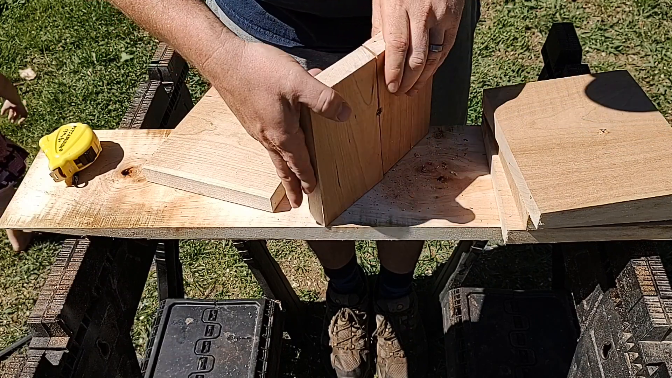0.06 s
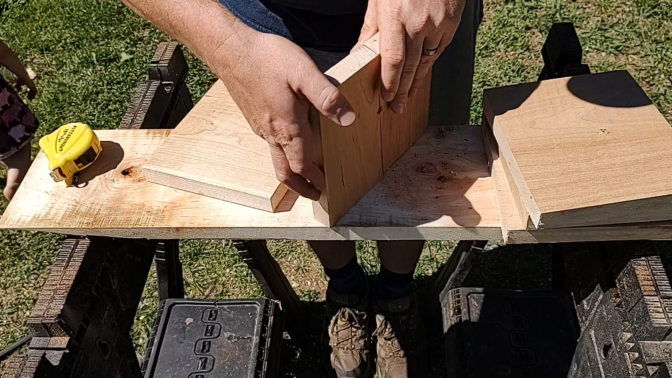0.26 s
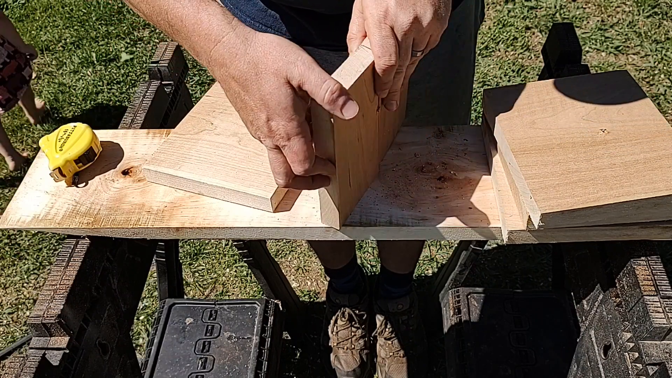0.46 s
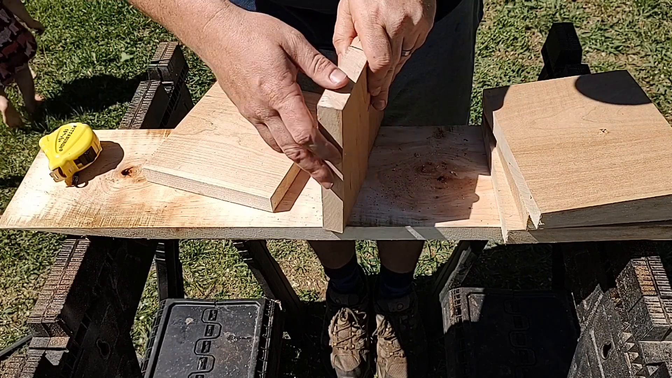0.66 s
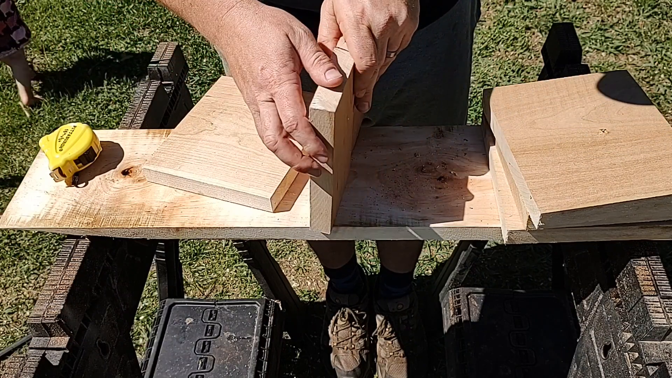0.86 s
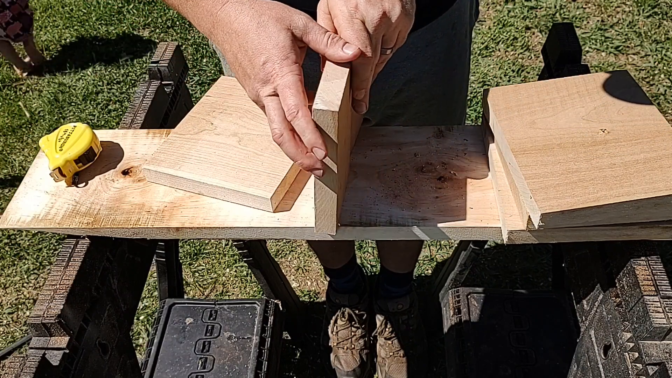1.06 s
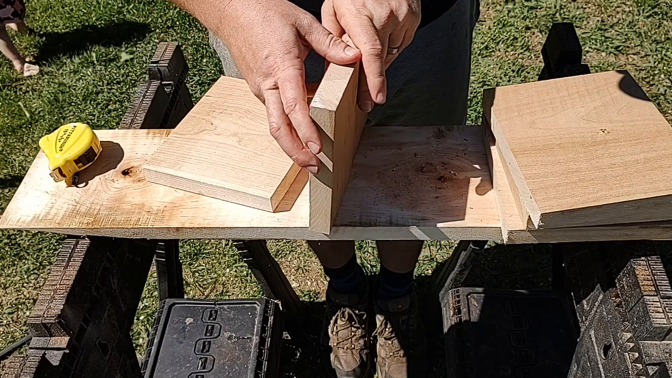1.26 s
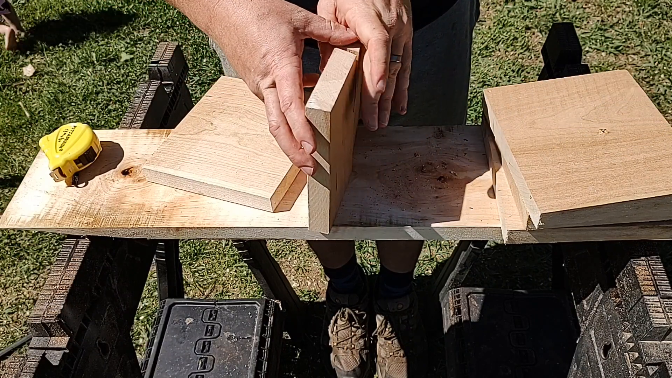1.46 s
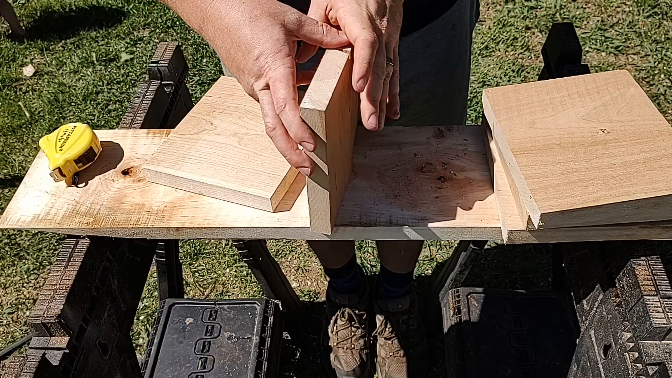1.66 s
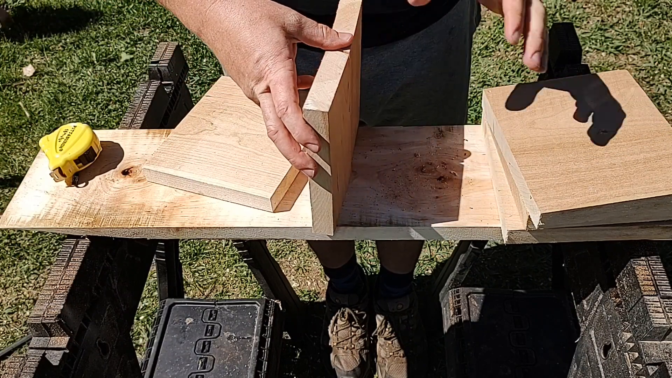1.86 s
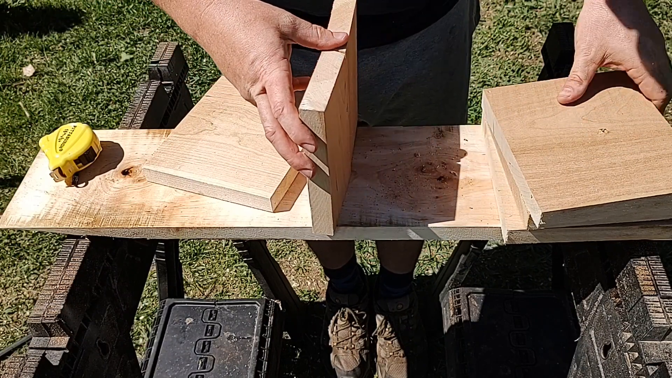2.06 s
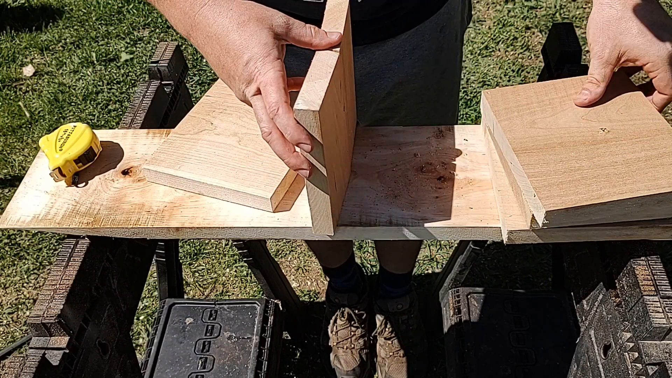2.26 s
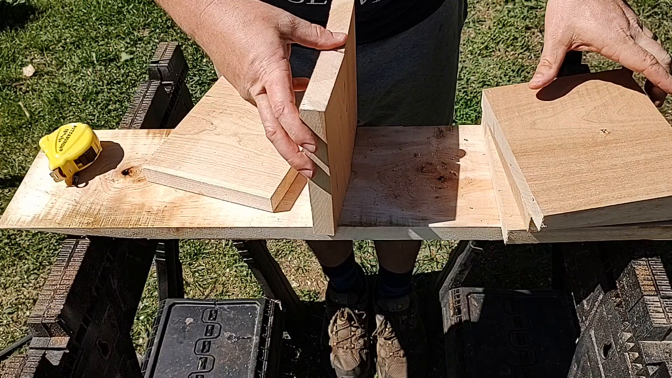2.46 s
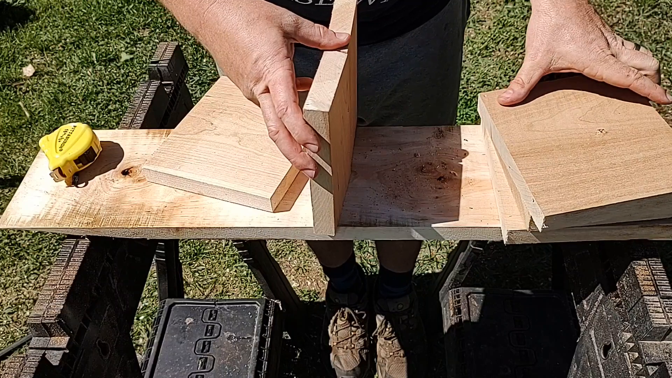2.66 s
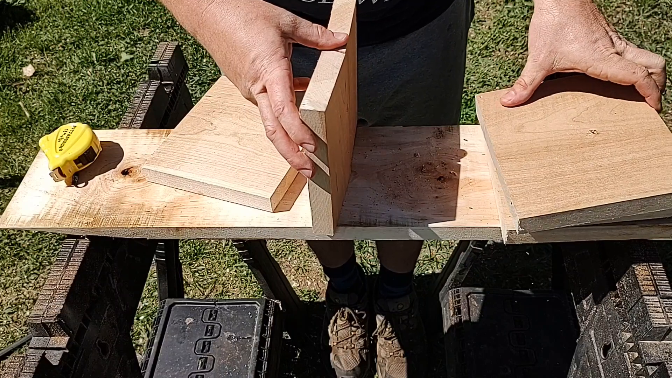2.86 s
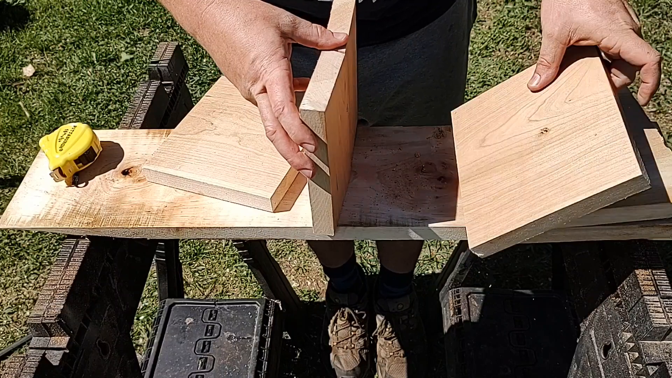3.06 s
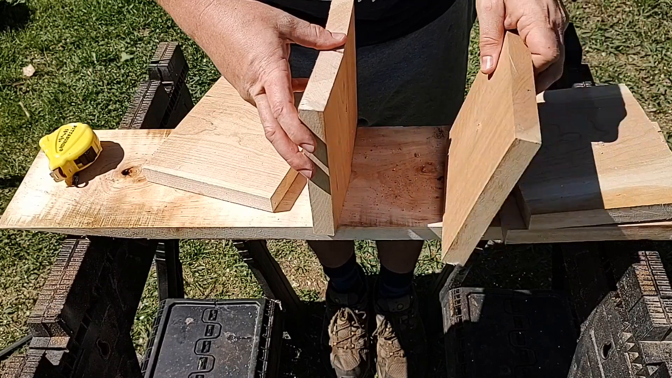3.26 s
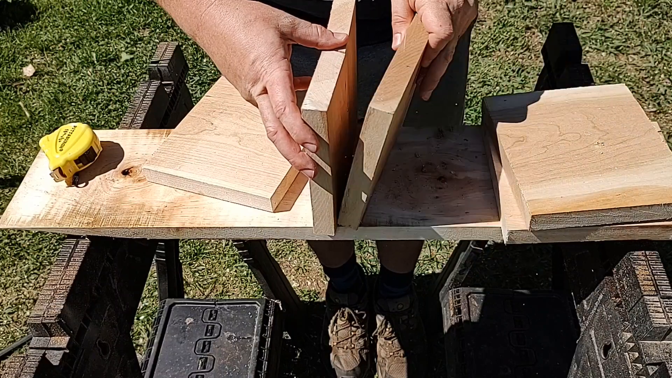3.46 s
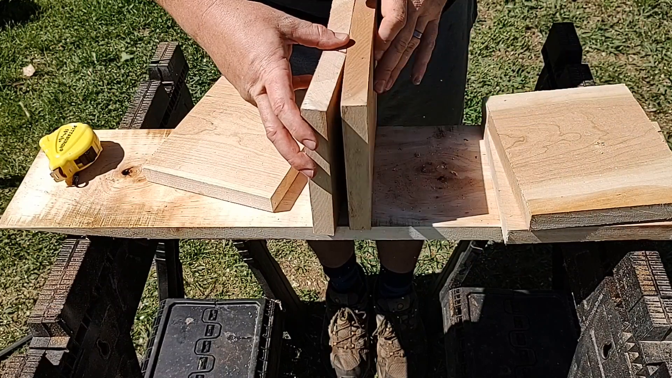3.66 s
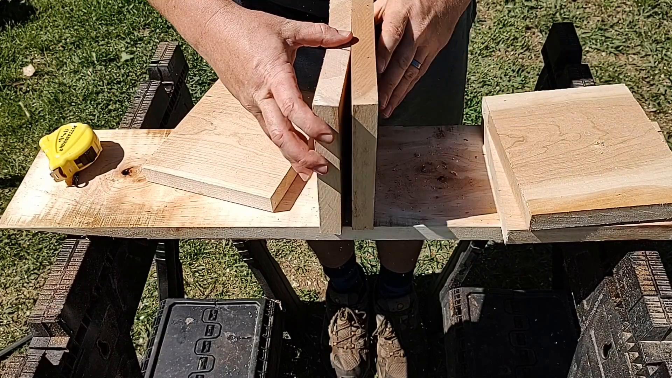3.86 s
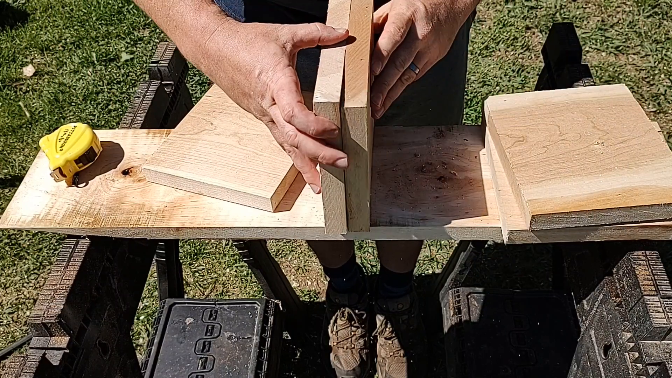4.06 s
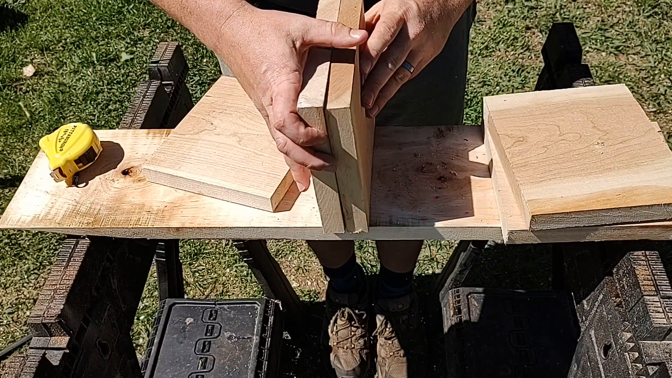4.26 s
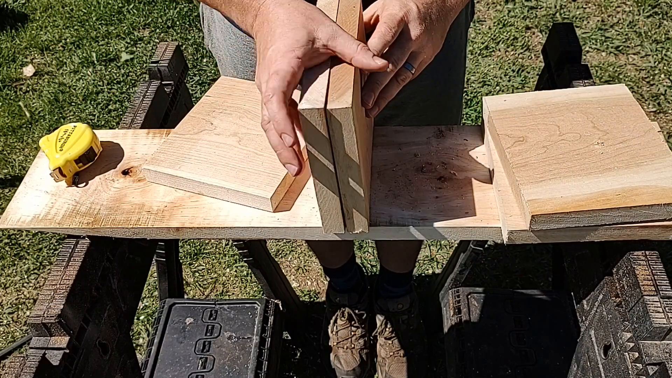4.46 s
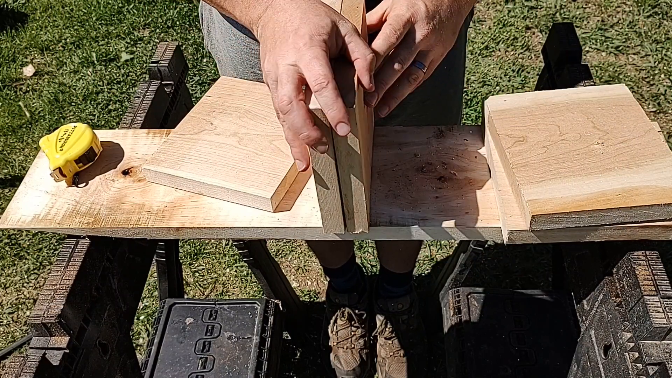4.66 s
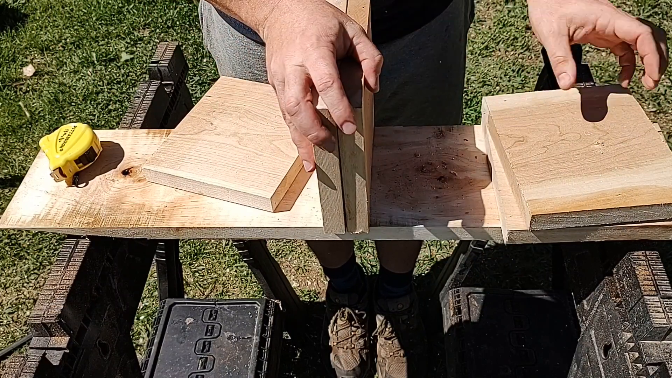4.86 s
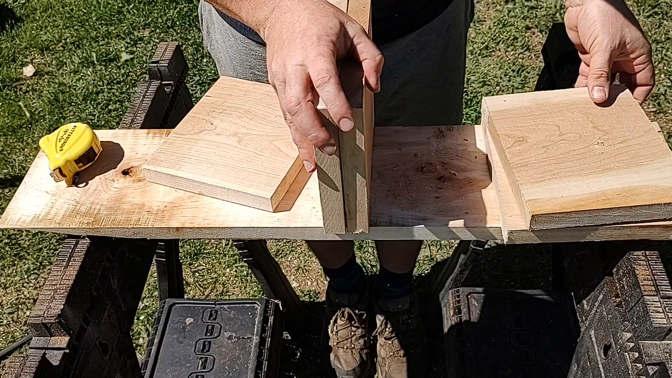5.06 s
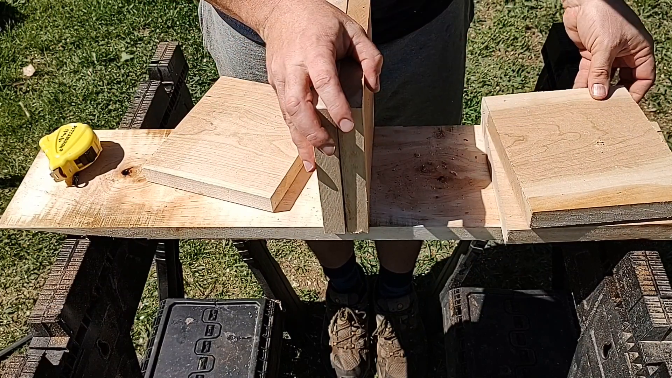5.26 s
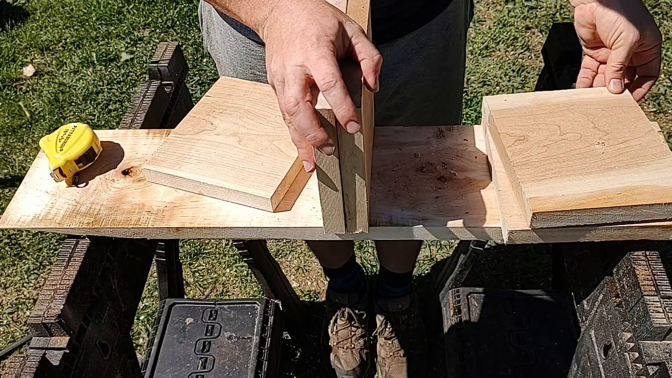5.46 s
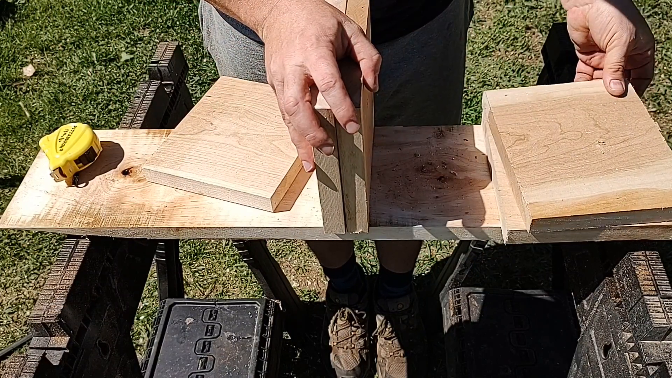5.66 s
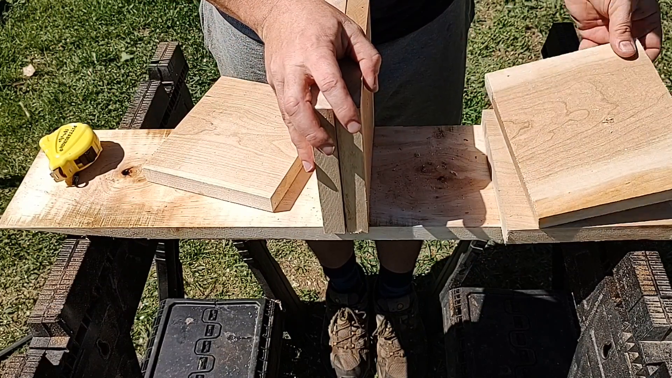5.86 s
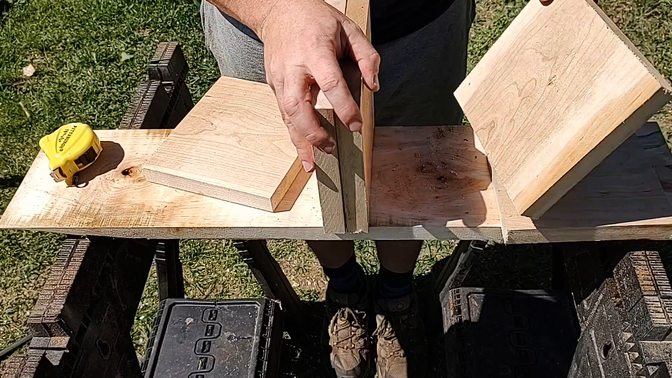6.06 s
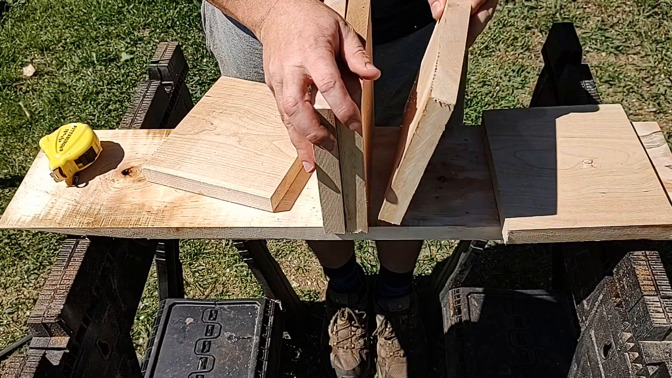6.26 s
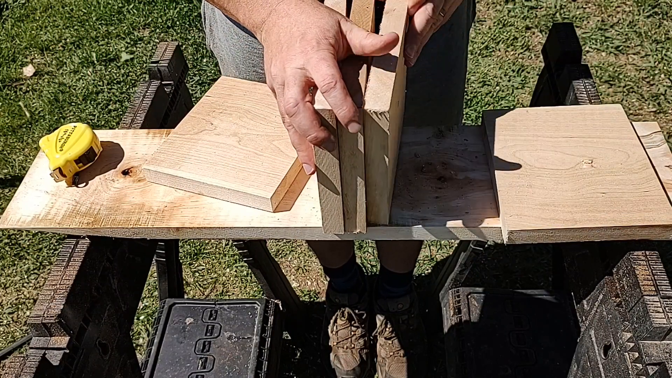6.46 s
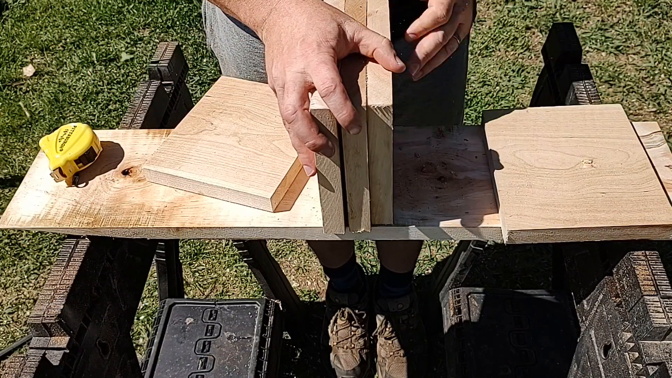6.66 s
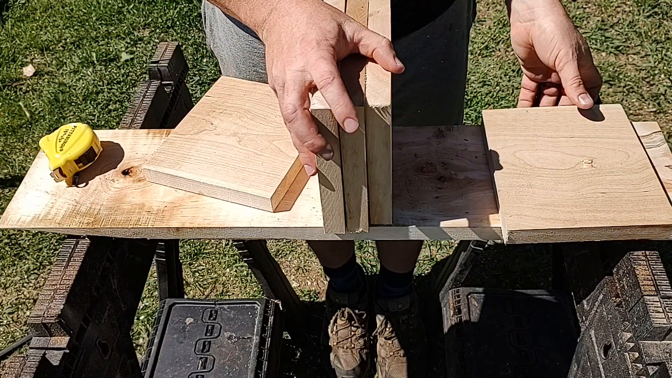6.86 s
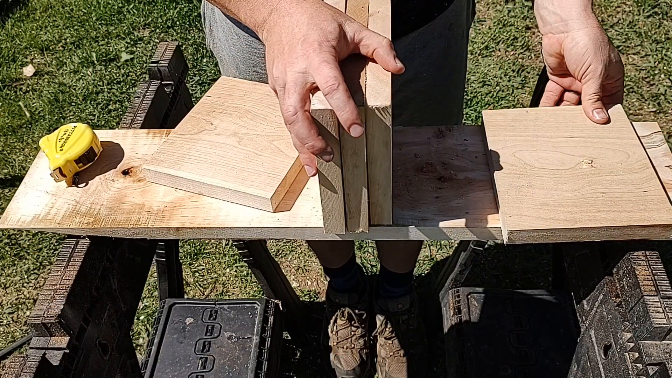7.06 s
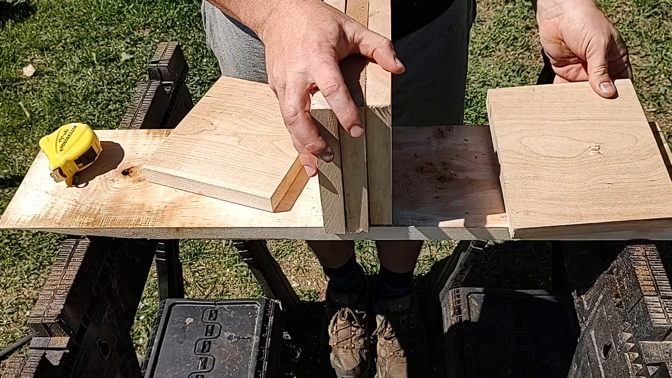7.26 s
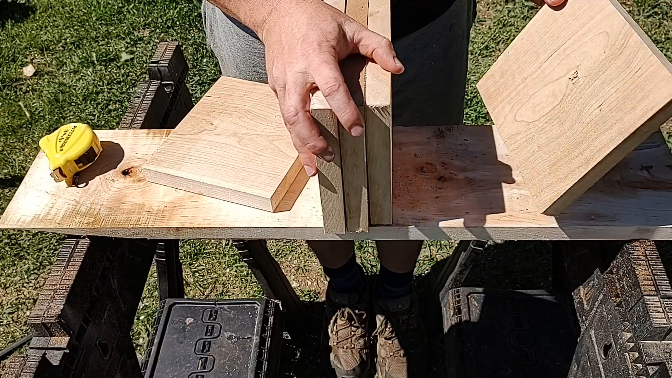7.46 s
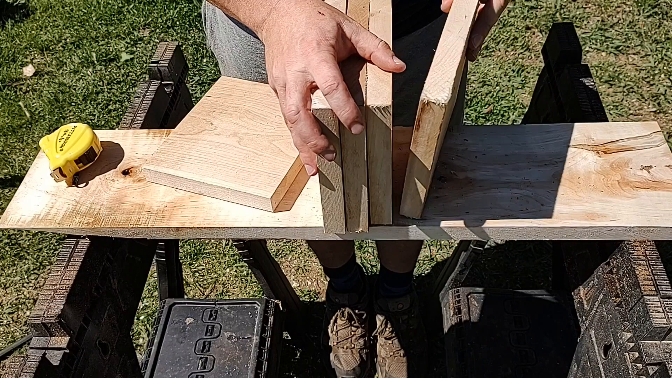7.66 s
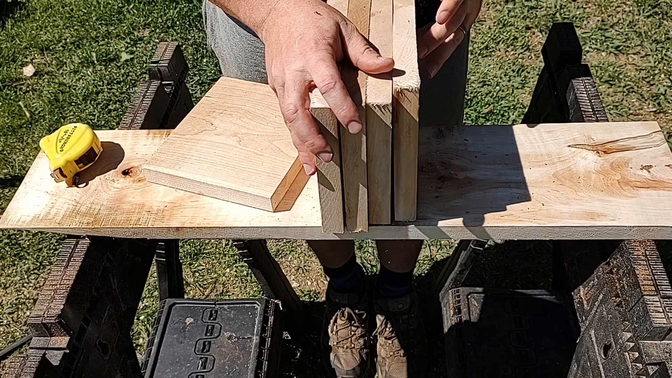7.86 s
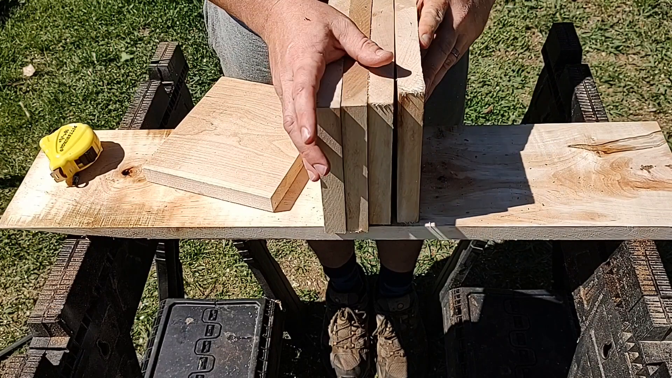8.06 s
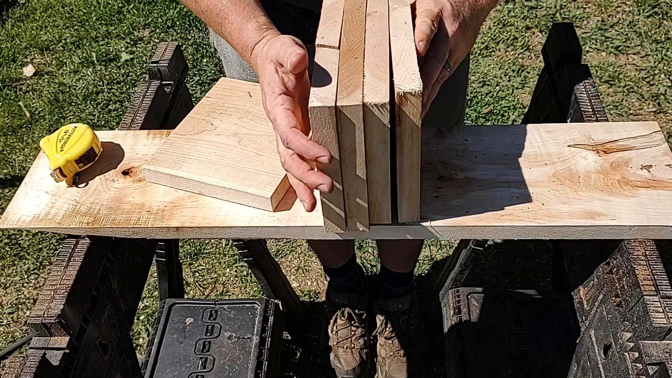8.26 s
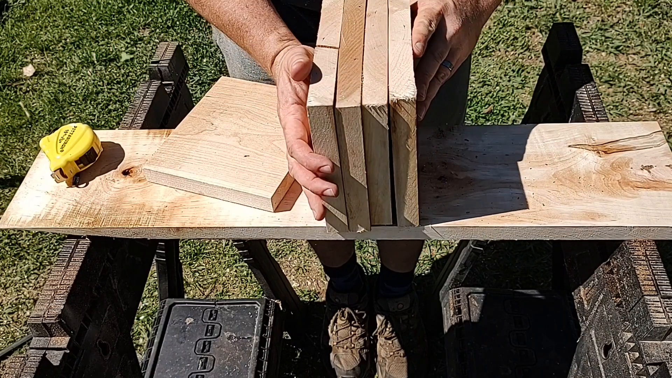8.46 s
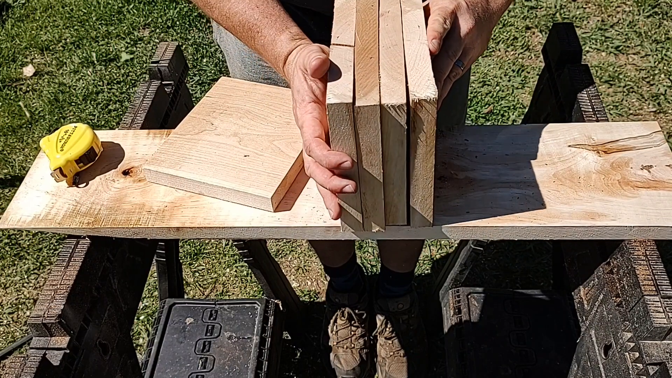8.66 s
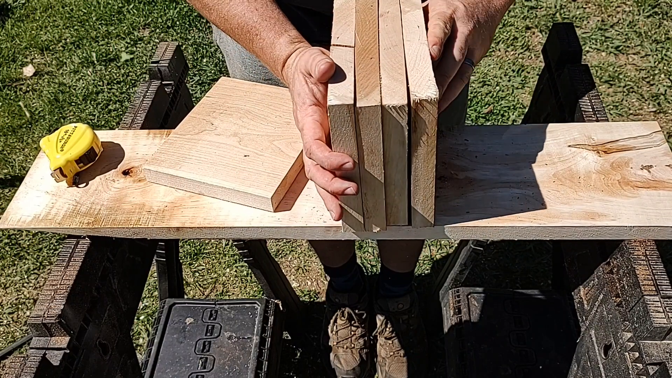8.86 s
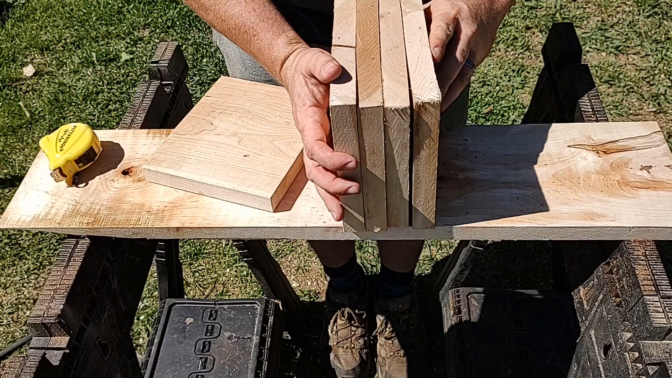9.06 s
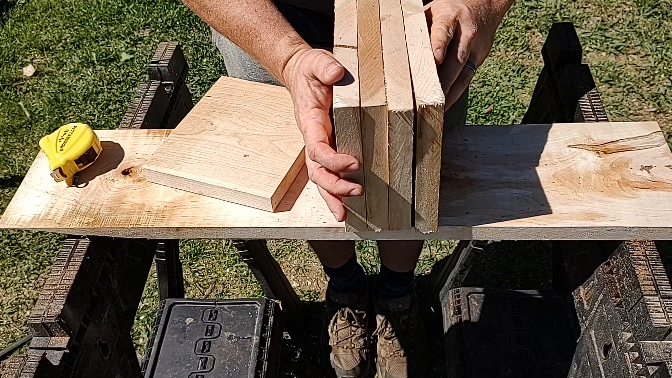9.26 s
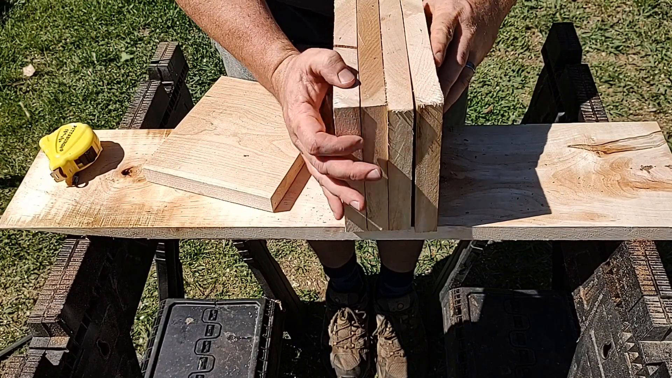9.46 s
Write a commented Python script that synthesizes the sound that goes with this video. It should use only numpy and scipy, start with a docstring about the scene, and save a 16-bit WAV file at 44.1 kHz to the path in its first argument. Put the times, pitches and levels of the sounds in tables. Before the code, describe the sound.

Close stereo sound of short pine boards handled on a plank outdoors. Soft sliding and dry hand brushing come first, then a cluster of woody knocks and claps as a second board joins the first. A third clacks in, and the last drops and slams loudly against the stack. Quiet shuffling follows. A light breeze and low distant engine hum swell gently behind.

```python
"""Short pine boards slide off a pile, knock on a plank and clap together into a stack, outdoors.
Each knock rings the wood's own notes, with a dense burst and a crunch of fibres.
Sliding and dry hands drive noise through the boards' notes, with a hiss from the surface.
Behind the work, gusts of a light breeze rumble and rush, and a low hum, like a distant engine,
swells with them."""
import sys
import numpy as np
from scipy import signal
from scipy.fft import rfft, irfft, next_fast_len
from scipy.io import wavfile
from scipy.ndimage import map_coordinates

SR = 44100
rng = np.random.default_rng(int(sys.argv[2]) if len(sys.argv) > 2 else 0)


def file_out(sig):
    """Save sig as 16-bit WAV at sys.argv[1]."""
    # one column per channel
    cols = np.atleast_2d(sig).T
    # limit, then scale
    lim = np.clip(cols, -1, 1)
    pcm = np.round(lim * 32767).astype(np.int16)
    wavfile.write(sys.argv[1], SR, pcm)


N = 418950  # length in samples

# In lists of ringing notes and noise colours, the dB only compare one row with another.
# A ring time is how long a note takes to fall by 60 dB, before a blow's own length factor.

# A board's edge lands or bounces on the plank. Each row: time in seconds, level in dB,
# extra thud in dB, extra brightness in dB.
KNOCKS = [ (1.5, -54, 6, 0), (2.74, -54, 7, -20), (3.279, -33, 6.5, -20), (3.34, -48, -1.5, -3),
          (3.415, -45, 8.5, -3), (3.545, -31.5, 9, -11), (3.672, -37.5, 13, -17), (4.706, -58.5, -2, -11),
          (5.089, -52.5, -2, -18), (5.743, -45.5, -1.5, -34), (5.765, -49.5, -1, -4),
          (6.493, -34.5, 3, -18), (6.499, -37.5, -7, -12.5), (8.395, -51, -10, -11),
          (8.526, -43.5, 5.5, -29)]
# A tap at this level rings for the listed time; a blow harder by RING_HALVES_DB rings half as long,
# because it is pressed home.
TAP_DB, RING_HALVES_DB = -49, 45.5
# The second board claps against the first, or one shifts in the stack. Each row: time in seconds,
# level in dB, extra thud in dB, extra brightness in dB, ring length factor (short: tight grip).
CLAPS = [(3.622, -28, -10.5, -9, 0.69), (3.718, -41, -6, -39, 0.71), (3.773, -38, -14.5, -18, 2.5),
         (3.789, -25, -21, -4, 1.1), (3.845, -35, 0, 0.5, 0.6), (3.851, -38, 3, 0, 0.49),
         (6.56, -41, -3, -17, 1), (8.108, -42.5, -5.5, -8, 0.9)]
# More blows, with the same columns as the claps.
# A lifted board, held loosely, taps its neighbour.
LOOSE_TAPS = [(5.046, -46, 1, 2, 1.3), (6.458, -38, -3, -9, 1.4)]
# The third board's top edge claps against the other two.
EDGE_CLAPS = [(6.656, -29, -1.1, 0.5, 0.91)]
# The last board is dropped on its edge, which settles flat and jumps once.
DROPS = [(7.8252, -16.5, -1, -14.5, 0.63), (7.8312, -26.5, -3.5, 5.5, 0.53), (7.841, -33, 5, -2, 1)]
# Its corner clips the stack, then its face slams home and rebounds.
CORNER_HITS = [(7.968, -23.5, -1, 0.5, 0.91)]
SLAMS = [(7.9838, -13.5, 0.5, -1.3, 0.76), (7.9912, -26, -8, -2, 1)]
# Air pushed out as the last face slams home. The row: time in seconds, peak in dB, pitch in Hz.
AIR_CLAP = (7.9841, -2, 960)

# The notes of struck wood. Each row: pitch in Hz, level in dB, ring time in seconds.
# The plank with a board on it:
PLANK = [(164, -25, 0.19), (213.5, -11.5, 0.17), (320, -3, 0.093), (362, -10.5, 0.1), (518, -9, 0.092),
         (652, -6.5, 0.1), (685, 10, 0.024), (776, -6, 0.12), (902, -8, 0.13), (1110, 0, 0.069),
         (1110, -1, 0.017), (1230, -15, 0.03), (1440, -8, 0.02), (1658, -31, 0.021), (1800, -9, 0.11),
         (2420, -18, 0.021)]
# A board held in the hand:
HELD_BOARD = [(330, -9, 0.065), (675, 5, 0.1), (934, 0, 0.023), (1210, -3, 0.029), (1175, -16, 0.023),
              (1660, -9.5, 0.083), (1710, 1.5, 0.04), (2730, -22.5, 0.085), (4220, -28, 0.058)]
# A loosely held board:
LOOSE_BOARD = [(654, -6.5, 0.068), (1335, -15, 0.061), (1800, -2, 0.038), (2700, -20, .05),
               (3500, -15, .028), (3940, -17, .05), (5180, -7, 0.03), (6730, -6, 0.027), (7241, -13, 0.029)]
# Three boards together:
THREE_BOARDS = [(290, -7, 0.043), (684, 1, .085), (790, -13, 0.17), (1120, 2, 0.032), (1450, -11, 0.049),
                (1603, -3, 0.057), (1790, 2.5, 0.022), (2200, -4, 0.024), (2750, -6.5, .028),
                (3330, -11, .025), (4200, -23, .03)]
# The plank under the dropped last board:
LOADED_PLANK = [(160, -4.5, 0.12), (280, -7, .085), (498.4, -10, 0.073), (693.6, 3, 0.048), (865, -5, .07),
                (1041, -6, .06), (1142, -8, .065), (1240, -2.5, .044), (1533, -12, .07),
                (1697, -11.5, .068), (1836, -13.5, 0.13), (2180, -20.5, .07), (4000, -11, 0.033)]
# A board struck at its corner:
CORNER = [(318, -14.5, .04), (657, -3, 0.04), (1130, 2, 0.033), (1230, -4, .02), (1623, -7, 0.028),
          (1890, 2, 0.029), (2090, 4.5, 0.015), (2480, -8.5, .018), (3250, -12.5, 0.021), (3680, -14, 0.02)]
# The whole stack:
STACK = [(296.7, -21.5, 0.099), (351, -14.5, 0.11), (520.5, -18.5, 0.088), (613, -14, .1), (845, 3, 0.044),
         (960, 3, 0.026), (1120, -9, 0.045), (1246, -0.5, 0.033), (1500, -7.5, 0.022), (1720, -4.5, .039),
         (1834, -7.5, 0.062), (2560, -23.5, 0.067), (2640, -11, .04)]
# Short notes too crowded to tell apart, made as noise. Each row: frequency in Hz, level in dB.
CROWDED_NOTES = [(120, -15.5), (300, 4.5), (1000, -1), (1850, -7), (2250, -24.5), (2700, -27), (3100, -34),
                 (4000, -29), (16000, -61.5)]
# The crunch of crushed fibres. Each row: frequency in Hz, level in dB.
CRUNCH = [(500, -43), (1500, -21.5), (2500, 14.5), (4500, 7), (7000, 3), (9500, 1.5), (12000, -25),
          (16000, -29)]

# A board slides over wood. Each row: time of fastest motion in seconds, rise in seconds,
# fall in seconds, drive of the wood's singing in dB, drive of the surface hiss in dB.
SLIDES = [(.13, 0.11, 0.19, -67.5, -76), (.5, 0.27, 0.3, -64.5, -64), (.87, 0.13, 0.1, -67, -62.5),
          (1.54, 0.15, 0.19, -69.5, -72), (2.98, 0.29, .2, -71, -89), (3.145, 0.15, 0.12, -56.5, -65),
          (3.205, 0.024, 0.12, -66, -61.5), (3.36, 0.08, 0.085, -60.5, -66), (3.68, 0.28, 0.2, -58, -70.5),
          (3.765, 0.017, .03, -55.5, -80), (3.97, 0.16, 0.52, -64.5, -78), (5.55, 0.12, 0.064, -64.5, -72),
          (5.7, 0.033, 0.017, -60.5, -72), (5.88, 0.039, 0.086, -63, -76), (6.035, 0.046, 0.135, -63, -70),
          (6.6, 0.15, 0.17, -63.5, -70.5), (7.26, 0.036, 0.22, -64, -76.5), (7.46, 0.069, 0.12, -58, -70),
          (7.935, 0.06, 0.097, -56.5, -70), (8.56, 0.34, 0.3, -66.5, -75), (9.15, 0.2, 0.43, -68.5, -93)]
# A hand brushes along the grain. Each row: time of fastest motion in seconds, rise in seconds,
# fall in seconds, drive of the surface hiss in dB.
BRUSHES = [(1.065, 0.077, 0.071, -59), (1.228, 0.037, 0.054, -48), (1.49, 0.12, 0.08, -63.5),
           (2.3, 0.11, 0.066, -62), (5.13, 0.31, 0.19, -65), (6.068, 0.036, 0.034, -55.5),
           (6.94, 0.091, 0.051, -65.5), (9.441, 0.023, 0.028, -57)]
BRUSH_SING_DB = -17.5  # drive of the wood's singing, compared with a brush's hiss
STROKE_SHAPE = 1.1  # 1 is a rounded swell; more gives a narrower peak
UNEVEN_DB, UNEVEN_PER_S = 1.2, 16  # the hand pushes unevenly: depth, changes a second
# A fingertip or splinter catches and lets go. Each row: time in seconds,
# drive of the wood's singing in dB, drive of the surface hiss in dB.
SNAPS = [ (.2405, -20.5, -51), (0.468, -31.5, -52), (0.528, -37.5, -51), (1.208, -62, -34.5),
         (1.22, -59, -34.5), (1.231, -49, -36.5), (1.402, -65, -50.5), (1.512, -62, -44.5),
         (1.545, -47, -60), (1.61, -41, -53), (3.544, -32, -68), (3.596, -38, -70), (4.027, -43, -62),
         (6.053, -48, -57), (6.072, -48, -57), (7.831, -31.5, -55.5), (8.472, -39.5, -63),
         (8.536, -49, -60.5), (8.757, -45.5, -62)]
# A sliding corner ticks over a ridge and wakes all the board's notes.
# Each row: time in seconds, drive in dB.
TICKS = [(0.471, -47), (0.575, -63), (1.612, -51), (4.028, -48), (4.299, -56), (5.04, -53), (5.877, -53.5),
         (7.253, -48.5)]
CATCHES_PER_S, CATCH_DB = 9, -1  # smaller random catches; their drive compared with the stroke's
FIBRES_PER_S, FIBRE_DB, FIBRE_SCATTER_DB, FIBRE_T60 = 420, -3, 4.2, .003  # last one in seconds
GRIP_SWAY_S, GRIP_PER_S = .0004, 14  # the grip bends the notes: sway in seconds, changes a second
# What the boards sing with when rubbed. Each row: pitch in Hz, width in Hz, level in dB.
FIRST_BOARD = [(1536, 60, 16), (2540, 180, -4), (3550, 90, 10), (4246, 83, 15.5), (6340, 1200, -0.5),
               (6740, 200, 12.5), (7270, 88, 9.5)]
SECOND_BOARD = [(1830, 54, 6.5), (2900, 150, -10), (3360, 150, -5.5), (4100, 170, -6.5), (5750, 160, -3),
                (6700, 170, 4), (7360, 220, 2), (8500, 210, -11), (9000, 250, -5)]
# The second board once it is on edge:
SECOND_ON_EDGE = [(444, 320, 12.5), (644, 230, 9.5), (1700, 350, 4.5), (2800, 300, -4), (4100, 260, -4.5),
                  (6940, 1440, -10)]
THIRD_BOARD = [(770, 120, 7), (1820, 140, 6.5), (2750, 200, 1.5), (3500, 350, 0), (4130, 130, 6),
               (5220, 130, 2), (5500, 210, -1), (6660, 290, 5), (7570, 270, 2), (9100, 500, -3)]
FOURTH_BOARD = [(854, 72, 14), (1216, 73, 6), (1730, 340, 3.5), (2684, 200, 3), (3370, 520, -3.5),
                (4140, 98, -2.5), (5090, 150, 0.5), (5730, 260, -1.5), (7160, 180, 6.5)]
# The stack as it is shuffled, then squeezed:
STACK_SHUFFLED = [(1750, 460, 2.5), (3270, 1600, -9), (5715, 1400, -13), (7200, 900, 1.5)]
STACK_SQUEEZED = [(1800, 250, 7), (2740, 340, -5), (3560, 690, 5), (5300, 530, -4), (6660, 450, 2.5),
                  (7600, 500, -19.5)]
RUBBED = [FIRST_BOARD, SECOND_BOARD, SECOND_ON_EDGE, THIRD_BOARD, FOURTH_BOARD,
          STACK_SHUFFLED, STACK_SQUEEZED]
# When each of these takes its turn. Each entry: start in seconds.
RUBBED_FROM_S = [0, 2.6, 3.48, 4.8, 7.0, 8.2, 8.93]
# The hiss of skin on wood. Each row: frequency in Hz, level in dB.
SKIN = [(800, -31), (2500, -23.5), (5000, -3), (7000, -4.5), (8700, 6.5), (10400, -2), (12000, -8.5),
        (16000, -16)]
# Where the rubbing hand is, heard in the hiss. Each row: time in seconds, left over right in dB.
HAND_SIDE = [(0.5, -3), (1.22, 7), (1.7, -5), (6.07, 9.5), (9.4, 2)]
# The edge squeaks thinly as it is set straight. Each row: time of fastest motion in seconds,
# rise in seconds, fall in seconds, pitch in Hz, level in dB.
SQUEAKS = [(1.49, .14, 0.18, 1794, -70)]
SQUEAK_WAVER_HZ, SQUEAK_ROUGH_DB = 26, 3.5
# Dull nudges of the bench. Each row: time in seconds, level in dB before a soft onset and small trim.
BUMPS = [(6.928, -20), (7.096, -17)]

# Echo scattered by the ground and things around. Each row: frequency in Hz, fade time in seconds.
YARD = [(150, 0.72), (700, 0.15), (2000, 0.38), (8000, 0.25)]
# Gusts of breeze, which carry the hum. Each row: peak time in seconds, strength in dB,
# rise in seconds, fall in seconds.
GUSTS = [(0.11, -8.5, 0.11, 0.31), (1.55, -23, 0.72, 0.93), (3.74, -4, 0.53, 0.34),
         (5.5, -12.5, 0.38, 0.38), (7.051, -2, 0.5, 0.69), (8.501, -15, 0.37, 0.49)]
LULL_DB = -28.5  # strength between gusts
GUST_SHAPE = 2.49  # 2 is a bell; more gives a flatter top and steeper sides
HUM_DB, HUM_HZ = -36.5, 93.2  # the engine's note at full gust (average level)
REV_S, REV_HZ = 7.85, 0.75  # when the engine speeds up a little, in seconds, and by how much
# Steadier tones beside the hum. Each row: pitch in Hz, level in dB at average swell.
DRONE = [(121.3, -58), (148, -68), (188, -73), (281, -80)]
# For each kind of wind noise: full-gust dB, lull dB, dB of growth per dB of gust.
BUFFET_DB, BUFFET_CALM_DB, BUFFET_GROWS = -47, -68, 1
AIR_DB, AIR_CALM_DB, AIR_GROWS = -57, -67, 0.53
# Eddies that catch the microphone. Each row: time in seconds, added buffeting in dB.
PUFFS = [(5.659, -57), (6.95, -47.5), (8.8, -58)]
PUFF_S = 0.16  # half length of an eddy
# Colour of the wind's buffeting. Each row: frequency in Hz, level in dB.
BUFFET = [(20, -41), (35, -13), (55, 0), (80, 2.5), (115, -3), (160, -7.5), (240, -28.5), (500, -53),
          (1000, -92)]
# Colour of the rush of open air. Each row: frequency in Hz, level in dB.
AIR = [(60, -3), (160, 4), (300, -0.5), (600, -4.5), (1200, -13), (2400, -15.5), (4500, -24.5),
       (16000, -48)]
# Spread of the open air. Each row: frequency in Hz, side over middle in dB.
WIDTH = [(110, -12), (380, -6.5), (900, 4.5), (2400, -1)]
# Colour of the steady high hiss. Each row: frequency in Hz, level in dB.
STEADY_HISS = [(1000, -22), (3000, -8.5), (4200, -1.5), (5200, -5.5), (7500, 2), (10400, -4), (11600, -13),
               (16000, -16)]
# Colour of the two microphone ports. Each row: frequency in Hz, left over right in dB.
PORTS = [(3000, 0.5), (4500, -1), (6000, -5.5), (7300, -4), (8500, 3.5), (9800, 9), (12000, 5.5),
         (16000, -0.5)]
TOP_HZ = 15850  # nothing passes above this


def amp(db):
    """Turn decibels into a multiplier."""
    return 10 ** (np.asarray(db) / 20)


def unit(x):
    """Scale to an average (rms) level of 1."""
    return x / np.sqrt(np.mean(x ** 2) + 1e-20)


def fade(t, t60):
    """Die away freely, by 60 dB in t60 seconds."""
    return np.exp(-np.log(1000) * t / np.maximum(t60, 1e-3))


def along(points, hz):
    """Read a value between (Hz, value) points, on a logarithmic frequency axis."""
    f, v = np.transpose(points)
    return np.interp(np.log(hz + 1), np.log(f + 1), v)


def wobble(rate, size=N):
    """Draw a smooth random curve through `rate` random points a second."""
    points = rng.standard_normal(int(size * rate / SR) + 4)
    return map_coordinates(points, [np.arange(size) * rate / SR])


def filtered(x, response):
    """Multiply a sound's spectrum by a function of frequency."""
    n = x.shape[-1]
    m = next_fast_len(n + 4096)
    return irfft(rfft(x, m) * response(np.fft.rfftfreq(m, 1 / SR)), m)[..., :n]


def pair(size, alike):
    """Make left and right white noise; `alike` is their correlation."""
    a, b = rng.standard_normal((2, size))
    turn = np.arccos(np.clip(alike, -1, 1)) / 2
    return np.cos(turn) * a + np.sin(turn) * np.array([b, -b])


def noise(spectrum, size, alike):
    """Make coloured stereo noise of rms 1."""
    return unit(filtered(pair(size, alike), lambda hz: amp(along(spectrum, hz))))


def add(track, s, sound):
    """Mix a sound into a track at time s."""
    part = track[:, max(round(s * SR), 0):][:, :sound.shape[-1]]
    part += sound[..., :part.shape[-1]]


def boards():
    """Boards land on the plank and clap on the stack; each meeting rings its own set of notes."""
    landings = []
    for s, db, thud, bright in KNOCKS:
        length = .5 ** ((db - TAP_DB) / RING_HALVES_DB)
        landings.append((s, db, thud, bright, length))
    knocks = blows(landings, PLANK, thud_db=8.0, bright_db=14.0, dense_db=0.0, dense_t60=0.075,
                   contact_hz=2600, spread=0.41, grit_db=-17, attack_s=0.00068, pan_db=-1.0)
    claps = blows(CLAPS, HELD_BOARD, thud_db=8, bright_db=7.5, dense_db=-0.5, dense_t60=0.067,
                  contact_hz=4300, spread=0.36, grit_db=-20, attack_s=0.00079, pan_db=0.5)
    taps = blows(LOOSE_TAPS, LOOSE_BOARD, thud_db=4, bright_db=0.5, dense_db=-4, dense_t60=0.05,
                 contact_hz=9000, spread=0.39, grit_db=-12, attack_s=.0008, pan_db=-3.0)
    edge = blows(EDGE_CLAPS, THREE_BOARDS, thud_db=2, bright_db=3.5, dense_db=7, dense_t60=0.034,
                 contact_hz=3720, spread=0.4, grit_db=-29, attack_s=0.0011, pan_db=-4.5)
    drop = blows(DROPS, LOADED_PLANK, thud_db=-0.5, bright_db=1, dense_db=1.5, dense_t60=0.084,
                 contact_hz=4760, spread=0.25, grit_db=-16.5, attack_s=.0016, pan_db=-0.2)
    corner = blows(CORNER_HITS, CORNER, thud_db=-1, bright_db=1.5, dense_db=-0.5, dense_t60=0.035,
                   contact_hz=3900, spread=0.15, grit_db=-37, attack_s=.0011, pan_db=-2.0)
    slam = blows(SLAMS, STACK, thud_db=-2.5, bright_db=0.5, dense_db=-1.5, dense_t60=0.077,
                 contact_hz=3390, spread=0.39, grit_db=-23, attack_s=0.00063, pan_db=-1.3)
    return knocks + claps + taps + edge + drop + corner + slam + air_clap()


def blows(rows, modes, thud_db, bright_db, dense_db, dense_t60, contact_hz, spread, grit_db,
          attack_s, pan_db):
    """Each contact starts the wood's notes together, with a burst of crowded ones and a crunch."""
    out, t = np.zeros((2, N)), np.arange(SR // 4) / SR
    hz, mode_db, t60 = np.transpose(modes)
    # a soft contact rounds off the treble; a small board radiates no deep bass
    contact = signal.butter(3, [85, min(contact_hz, SR / 3)], "bandpass", fs=SR, output="sos")
    press = 1 - np.exp(-(t / attack_s) ** 2)
    for s, db, thud, bright, length in rows:
        # a heavy blow favours the low notes, a hard corner the high ones
        low, high = thud + thud_db, bright + bright_db
        tone = [(340, low), (620, 0.002), (1100, 0), (1800, high), (3200, 1.6 * high)]
        size = amp(mode_db + along(tone, hz) + rng.normal(0, 1, len(hz)))
        # short waves reach the two ports out of step
        sign = (-1) ** np.arange(len(hz))
        skew = spread * sign * np.minimum(hz / 1000, 2) * rng.uniform(.8, 1.2, len(hz))
        swing = size[:, None] * fade(t, length * t60[:, None])
        phase = 2 * np.pi * hz[:, None] * t
        ring = np.array([(swing * np.sin(phase + side * skew[:, None])).sum(0) for side in (1, -1)])
        crowd = noise(CROWDED_NOTES, size=len(t), alike=.75)
        crowd = filtered(crowd, lambda f: amp(along(tone, f))) * fade(t, length * dense_t60)
        wood = signal.sosfilt(contact, (ring + amp(dense_db) * crowd) * press)
        # set the level by the first hundredth of a second
        wood /= np.sqrt(np.mean(wood[:, :SR // 100] ** 2))
        # the fibres crunch while the edge presses in
        crunch = amp(grit_db) * noise(CRUNCH, size=len(t), alike=0.054)
        crunch *= fade(t, 0.069) * (1 - np.exp(-t / 0.0018))
        add(out, s, amp(db) * (wood + crunch))
    return out * amp(np.array([[.5], [-.5]]) * pan_db)


def air_clap():
    """Two flat faces meet and drive out the air between them in one sharp push."""
    s, db, hz = AIR_CLAP
    u = np.pi * hz * (np.arange(N) / SR - s)
    return amp(db) * (1 - 2 * u ** 2) * np.exp(-u ** 2)


def rubbing(wood_rough_db, skin_rough_db, slip_db):
    """Uneven noise stands for stick-slip friction: it makes boards sing and their surface hiss."""
    strokes, snaps, ticks = pressure(snap_t60=0.016)
    wood_force, skin_force = strokes * amp(slip_db * wobble(45))
    grains = amp(FIBRE_DB) * fibres(FIBRES_PER_S, FIBRE_SCATTER_DB)
    friction = unit(pair(N, 0.086) * amp(wood_rough_db * wobble(220)) + grains)
    # a snap is so brief and hard that it wakes mostly the high notes
    high_only = signal.butter(3, 5600, "highpass", fs=SR, output="sos")
    sharp = amp(-5.5) * signal.sosfilt(high_only, snaps[0] * pair(N, 0.4))
    drive = wood_force * friction + ticks * pair(N, 0.36) + sharp

    wood = np.zeros((2, N))
    for start, end, modes in zip(RUBBED_FROM_S, RUBBED_FROM_S[1:] + [N / SR], RUBBED):
        part = drive[:, round(start * SR):round(end * SR)]
        add(wood, start, singing(part, modes, wander_db=3.0, wander_per_s=22.56))
    # the changing grip bends the notes a little
    bent = np.arange(N) + GRIP_SWAY_S * SR * wobble(GRIP_PER_S)
    wood = np.array([map_coordinates(channel, [bent]) for channel in wood])

    surface = pair(N, 0.12) * amp(skin_rough_db * wobble(400)) + grains
    hiss = unit(filtered(surface, lambda hz: amp(along(SKIN, hz))))
    skin = (skin_force + snaps[1]) * hiss
    side_s, side_db = np.transpose(HAND_SIDE)
    side_db = np.interp(np.arange(N) / SR, side_s, side_db)
    return wood * amp([[0.8], [4.4]]) + skin * amp(-0.36 + np.array([[.5], [-.5]]) * side_db)


def pressure(snap_t60):
    """How hard rubbing drives wood and surface: strokes swell and ebb, snaps and ticks die fast."""
    strokes, snaps = np.zeros((2, 2, N))
    brushes = [(*times, db + BRUSH_SING_DB, db) for *times, db in BRUSHES]
    for fastest, rise, fall, *db in SLIDES + brushes:
        add(strokes, fastest - rise, amp(db)[:, None] * stroke(rise, fall))
    strokes *= amp(UNEVEN_DB * wobble(UNEVEN_PER_S))

    t = np.arange(SR // 10) / SR
    release = amp(9) * fade(t, snap_t60) * (1 - np.exp(-t / 0.0017))
    for s, *db in SNAPS:
        add(snaps, s, amp(db)[:, None] * release)
    for i in np.flatnonzero(rng.random(N) < CATCHES_PER_S / SR):
        add(snaps, i / SR, amp(CATCH_DB) * strokes[:, i, None] * release)
    ticks = np.zeros((1, N))
    for s, db in TICKS:
        add(ticks, s, amp(db) * release)
    return strokes, snaps, ticks


def stroke(rise, fall):
    """Speed of a hand movement: it gathers, peaks and ebbs to rest."""
    t = np.arange(round((rise + fall) * SR)) / SR
    progress = np.interp(t, [0, rise, rise + fall], [0, 1, 0])
    return np.abs(np.sin(np.pi / 2 * progress)) ** STROKE_SHAPE


def fibres(per_s, scatter_db):
    """Single fibres let go at random: brief grains of very different sizes."""
    t = np.arange(SR // 200) / SR
    starts = rng.random(N) < per_s / SR
    sizes = starts * amp(scatter_db * np.minimum(rng.exponential(size=N), 3))
    return unit(signal.fftconvolve(sizes, fade(t, FIBRE_T60))[:N] * pair(N, 0.24))


def singing(drive, modes, wander_db, wander_per_s):
    """The contact point travels, so each note of a rubbed board swells and sinks by itself."""
    def resonance(f, centre, width, db):
        peak = centre * width / (centre * centre - f * f + 1j * f * width)
        return amp(db) * peak * f / (f - 1200j)  # the last part weakens the bass

    grid = np.fft.rfftfreq(SR // 4, 1 / SR)
    total = np.sqrt(np.mean(abs(sum(resonance(grid, *m) for m in modes)) ** 2))
    out = np.zeros(drive.shape)
    for m in modes:
        note = filtered(drive, lambda f: resonance(f, *m))
        out += note * amp(wander_db * wobble(wander_per_s, size=drive.shape[1]))
    return out / total


def squeaks():
    """Quick, even slips hold one thin wavering note."""
    out = np.zeros((2, N))
    for fastest, rise, fall, hz, db in SQUEAKS:
        speed = stroke(rise, fall)
        turns = np.cumsum(hz + SQUEAK_WAVER_HZ * wobble(81, size=len(speed))) / SR
        level = amp(db + SQUEAK_ROUGH_DB * wobble(55, size=len(speed))) * speed
        add(out, fastest - rise, level * np.sin(2 * np.pi * turns))
    return out


def bumps(hz, t60):
    """The nudged bench booms softly: one low note that dies away."""
    out, t = np.zeros((2, N)), np.arange(SR // 4) / SR
    boom = np.sin(2 * np.pi * hz * t) * fade(t, t60) * (1 - np.exp(-t / 0.0074))
    for s, db in BUMPS:
        add(out, s, amp(db - 0.5) * boom)
    return out


def yard(x):
    """Faint scatter from the ground and things around: a fading noise tail follows the sound."""
    hz, t, z = signal.stft(rng.standard_normal((2, SR // 2)), SR, nperseg=256)
    tail = signal.istft(z * fade(t, along(YARD, hz)[:, None]), SR, nperseg=256)[1]
    return signal.fftconvolve(x, tail / np.linalg.norm(tail[0]), axes=1)[:, :N]


def engine():
    """A far engine: a low note that swells with the breeze, with fainter wavering tones beside it."""
    revved = np.arange(N) / SR > REV_S
    turns = np.cumsum(HUM_HZ + REV_HZ * revved + .5 * wobble(6.3)) / SR
    swell_db = HUM_DB + 20 * np.log10(gusts())
    hum = amp(swell_db + 1.3 * wobble(12.0)) * np.sin(2 * np.pi * turns)
    for hz, db in DRONE:
        level = db + 0.45 * (swell_db - swell_db.mean()) + 1.2 * wobble(6.3)
        hum += amp(level) * np.sin(2 * np.pi * np.cumsum(hz + 0.91 * wobble(5.7)) / SR)
    # it comes from the right: louder there, and a quarter of a millisecond earlier
    loudness, lead = amp([[-.9], [.9]]), 0.00025 * np.array([[-1], [1]])
    # the root of 2 makes the levels above rms levels
    return filtered(np.sqrt(2) * hum, lambda hz: loudness * np.exp(1j * np.pi * hz * lead))


def gusts():
    """Strength of the breeze, 1 at a gust of 0 dB: each gust rises and falls like a flattened bell."""
    t = np.arange(N) / SR
    power = amp(LULL_DB) ** 2
    for s, db, rise, fall in GUSTS:
        distance = abs(t - s) / np.where(t < s, rise, fall)
        power = power + amp(db) ** 2 * np.exp(-distance ** GUST_SHAPE)
    return np.sqrt(power)


def breeze():
    """Soft buffeting and the rush of open air grow with the gusts, over a steady high hiss."""
    gust, t = gusts(), np.arange(N) / SR
    eddies = sum(amp(db) * np.exp(-((t - s) / PUFF_S) ** 2) for s, db in PUFFS)
    buffet_level = np.hypot(amp(BUFFET_CALM_DB), amp(BUFFET_DB) * gust ** BUFFET_GROWS) + eddies
    air_level = np.hypot(amp(AIR_CALM_DB), amp(AIR_DB) * gust ** AIR_GROWS)
    buffet = buffet_level * amp(1.7 * wobble(5.3)) * noise(BUFFET, size=N, alike=0.29)
    air = air_level * amp(1.3 * wobble(3.6)) * outdoors(AIR)
    hiss = amp(-68.0 + 0.53 * wobble(3.284)) * noise(STEADY_HISS, size=N, alike=0.064)
    return buffet + air + hiss


def outdoors(spectrum):
    """Noise of rms 1 from all around: how alike the two ports hear it depends on the pitch."""
    mid, side = filtered(rng.standard_normal((2, N)), lambda hz: amp(along(spectrum, hz)))
    side = filtered(side, lambda hz: amp(along(WIDTH, hz)))
    return unit(np.array([mid + side, mid - side]))


def scene():
    """The work on the bench, close by, in the open air."""
    hits = boards()
    rubs = rubbing(wood_rough_db=2.0, skin_rough_db=2.0, slip_db=1.83)
    handling = rubs + squeaks() + bumps(hz=99.7, t60=0.086)
    return hits + amp(-24.5) * yard(hits) + handling + engine() + breeze()


def record(dry):
    """Two microphone ports colour the sound differently; high peaks are rounded, the top cut off."""
    ports = filtered(dry, lambda hz: amp(np.array([[.5], [-.5]]) * along(PORTS, hz)))
    rounded = ports / (1 + abs(ports / .98) ** 10) ** .1
    return filtered(rounded, lambda hz: hz < TOP_HZ)


dry = scene()
out = record(dry)
file_out(out)
```